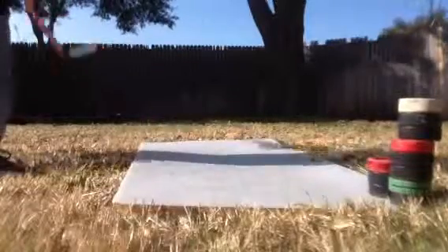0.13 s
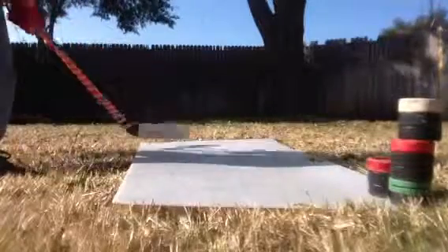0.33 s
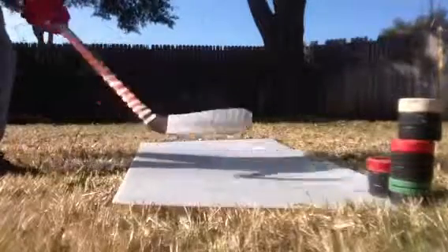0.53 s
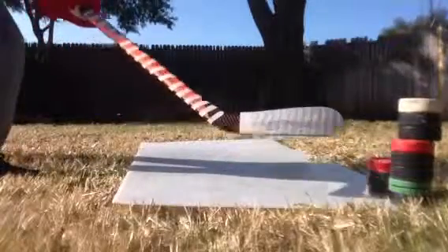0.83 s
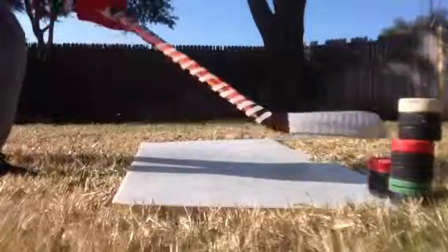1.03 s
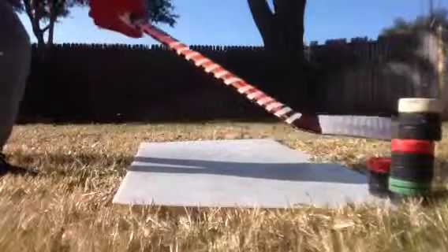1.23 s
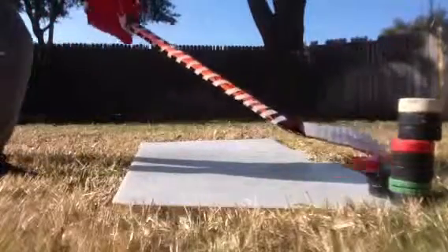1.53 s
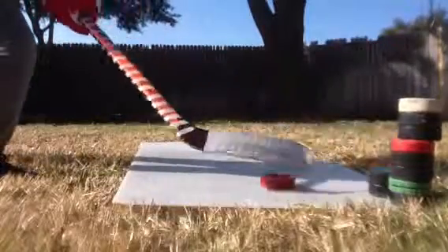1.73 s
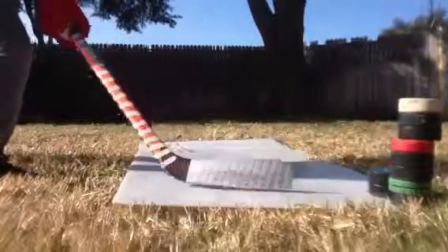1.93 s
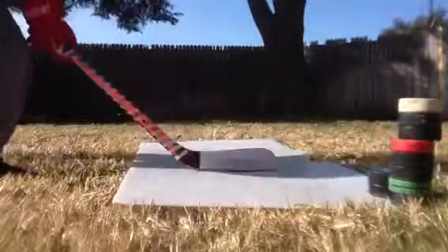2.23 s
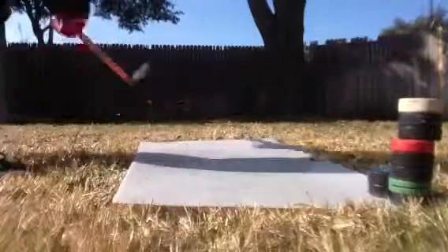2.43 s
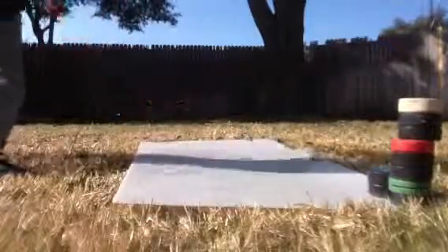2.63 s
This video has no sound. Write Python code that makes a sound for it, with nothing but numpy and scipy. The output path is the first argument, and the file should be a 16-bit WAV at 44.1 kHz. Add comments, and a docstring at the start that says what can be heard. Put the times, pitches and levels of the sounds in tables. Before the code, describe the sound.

A shot hockey puck cracks hard against boards and echoes round a yard; after a quiet gap with faint footfalls, another puck clatters on a plastic pad close to the microphone, is tapped, scraped and flicked.

```python
"""Backyard hockey practice

A shot puck cracks against boards, modelled as ringing modes plus noise bursts, and the yard echoes.
The stick pulls the next puck off a stack: it clatters onto a plastic pad as struck modes, is tapped
by the blade, swept along with a rising friction hiss and flicked off the toe.
Feet thud on the dry lawn as short low swells, over rustles, a low ring and outdoor air of coloured noise."""
import sys
import numpy as np
from scipy import signal
from scipy.fft import rfft, irfft, next_fast_len
from scipy.io import wavfile

SR = 44100
rng = np.random.default_rng(int(sys.argv[2]) if len(sys.argv) > 2 else 0)


def digitize_waveform(pressure):
    """Quantize a signal to 16-bit integers and store it at the path in sys.argv[1].

    Rows of a 2-D input are taken as channels; values are limited to [-1, 1].
    """
    field = np.atleast_2d(pressure).T
    bounded = np.clip(field, -1, 1)
    quanta = np.round(bounded * 32767).astype(np.int16)
    wavfile.write(sys.argv[1], SR, quanta)


N = 123479
TIME = np.arange(N) / SR  # seconds

# The shot landing, then its reflections. Each row: start in seconds, level in dB.
CRACK_ARRIVALS = [(0.2422, -0.94), (.2546, -12), (0.2743, -14), (.2785, -13)]
# Modes of the struck boards. Each row: frequency in Hz, level in dB, t60 in seconds.
BOARD_MODES = [(202, -10.5, 0.084), (273, -8, 0.027), (434, -26, 0.059), (530, -12, 0.077),
               (631, -22, 0.11), (960, -22.5, 0.053), (1614, -34.5, 0.27), (2440, -34, .3),
               (2570, -21, 0.046), (2720, -19, 0.018), (3670, -25, 0.044), (4670, -28.5, 0.09)]
# Colour of the crack's short burst. Each row: frequency in Hz, relative level in dB per Hz.
CRACK_COLOUR = [(100, -28), (400, 6.5), (900, 3.5), (2200, -1.5), (2900, 5.5), (4300, 0), (6000, -8),
                (11500, -11.5), (15500, -21)]
# Colour of the crack's wash round the yard. Each row: frequency in Hz, relative level in dB per Hz.
CRACK_WASH_COLOUR = [(60, -37), (120, -4), (190, 11.5), (400, 5.5), (650, 0.5), (950, -4), (2700, -5),
                     (4800, -8.5), (6100, -13.5), (11000, -18.5), (15500, -42)]
# The puck knocking on the pad; the row at 1.9432 s is the blade striking the puck. Each row: start in seconds,
# knock, edge click and puck ring levels in dB.
PAD_KNOCKS = [(1.6584, -1.5, -23, -28.5), (1.6653, -12, -40, -46), (1.6844, 1, -19.5, -25),
              (1.6894, -21, -25, -36), (1.7282, -14, -32.5, -42), (1.9432, -10.5, -27, -21.5),
              (2.386, -15.5, -37, -44)]
# Modes of the plastic pad. Each row: frequency in Hz, level in dB, t60 in seconds.
PAD_MODES = [(242, -16.5, 0.032), (382, -11, 0.021), (564, -11.5, 0.018), (1360, -16, 0.0087),
             (1570, -26, 0.03), (2310, -34, 0.016)]
# Colour of the puck's edge click. Each row: frequency in Hz, relative level in dB per Hz.
CLICK_COLOUR = [(300, -1), (1500, 4.5), (2400, -1.5), (11000, -7.5), (15500, -13)]
# Modes of the hard puck. Each row: frequency in Hz, level in dB, t60 in seconds.
PUCK_MODES = [(3400, -2, 0.0077), (4350, -7, .008), (6730, -5, 0.013), (10340, -8, .011)]
# The blade touching puck or pad. Each row: start in seconds, level in dB, contact hardness as cut-off in Hz.
BLADE_TAPS = [(2.0605, 0, 1650), (2.205, -15.5, 1700), (2.2244, -16.5, 2220), (2.263, -13.5, 1150),
              (2.3025, -7.5, 623), (2.403, -9, 1610), (2.4097, -10.5, 2000), (2.4196, -13.5, 3500),
              (2.425, -17, 4500), (2.466, 0, 450), (2.5042, -15, 615)]
# Modes of the blade. Each row: frequency in Hz, level in dB, t60 in seconds.
BLADE_MODES = [(311, -20.5, 0.031), (485, -20, 0.028), (638, -20.5, 0.026), (868, -16, 0.012),
               (1334, -12.5, 0.012), (1600, -14, 0.0074), (2160, -20, 0.009), (3200, -27, 0.01),
               (4120, -21.5, 0.013)]
# The sweep along the pad. Each row: time in seconds, level of the sliding hiss in dB.
SWEEP_LEVEL = [(1.69, -90), (1.74, -55), (1.88, -74), (2.06, -63.5), (2.1, -55.5), (2.19, -54), (2.27, -49),
               (2.345, -43.5), (2.386, -38), (2.396, -49.5), (2.43, -53), (2.46, -66.5)]
# Colour of the friction hiss. Each row: frequency in Hz, relative level in dB per Hz.
HISS_COLOUR = [(2000, -12), (4200, -6.5), (5500, -15), (6600, -5), (7400, -11.5), (9500, -9.5),
               (10500, -5.5), (11200, -5.5), (12400, -0.5), (13300, -9), (15500, -24)]
# Spinning puck rubbing on the blade's tape. Each row: centre in seconds, level in dB, half length in seconds.
TAPE_RASPS = [(1.705, -49, 0.0069), (1.957, -46.5, 0.0048), (2.409, -39, 0.0035), (2.423, -33.5, 0.0047)]
# Colour of those rasps. Each row: frequency in Hz, relative level in dB per Hz.
RASP_COLOUR = [(600, -3), (1500, 5.5), (4200, -0.5), (5500, -10), (12000, -15)]
# Shudders of the pad. Each row: centre in seconds, level in dB, half length in seconds.
PAD_WOBBLES = [(1.935, -40, 0.029), (2.512, -36, 0.029)]
# Colour of those shudders. Each row: frequency in Hz, relative level in dB per Hz.
WOBBLE_COLOUR = [(70, -14.5), (170, 1), (330, -0.5), (600, -45.5)]
# Feet and stick on the lawn. Each row: start in seconds, level in dB, frequency in Hz, rise in seconds.
LAWN_THUDS = [(.531, -26, 245, 0.0015), (1.175, -41, 105, 0.0071), (1.234, -26.5, 210, 0.0026),
              (1.495, -36, 150, 0.0048), (1.605, -31.5, 137, 0.0047), (1.630, -25.5, 189, 0.0029),
              (1.881, -32, 184, 0.0037), (1.919, -31, 237, 0.0017), (2.172, -34.5, 195, 0.0021),
              (2.4659, -22, 175, 0.0032), (2.504, -27.5, 158, 0.0035), (2.511, -26.5, 282, 0.004),
              (2.524, -30, 163, 0.0059)]
# Faint cloth and dry grass. Each row: centre in seconds, level in dB, half length in seconds.
FAINT_RUSTLES = [(0.507, -55.5, 0.018), (0.736, -57.5, 0.023), (0.846, -56.5, 0.01), (0.887, -60.5, 0.066)]
# Colour of those rustles. Each row: frequency in Hz, relative level in dB per Hz.
RUSTLE_COLOUR = [(1500, -21), (4500, -1.5), (9000, 4), (12500, 4.5), (15500, 1.5)]
# Colour of the low rustle of movement. Each row: frequency in Hz, relative level in dB per Hz.
SHUFFLE_COLOUR = [(40, -38), (150, 0), (300, -8.5), (600, -16), (1500, -27), (5000, -35.5)]
# The low rustle over time. Each row: time in seconds, level in dB.
SHUFFLE_OVER_TIME = [(0, -47.5), (.55, -53), (.7, -56), (1.08, -55), (1.18, -52), (1.6, -51), (1.85, -48.5),
                     (2.53, -48), (2.66, -51.5), (2.8, -47.5)]
# How long the yard rings. Each row: frequency in Hz, t60 in seconds.
YARD_DECAY = [(150, .75), (500, .58), (2000, .7), (4500, .56), (7000, .41), (13000, .34)]
# Colour of the yard's echo of the stickwork. Each row: frequency in Hz, relative level in dB per Hz.
YARD_COLOUR = [(100, -3), (400, -1), (1200, -4), (14000, -6)]
# Colour of the outdoor air. Each row: frequency in Hz, relative level in dB per Hz.
AIR_COLOUR = [(29, -62), (50, -6), (150, 3), (214, 2), (557, -21.5), (964, -3.5), (1970, -17),
              (8070, -20.5), (15000, -28.5)]

CRACK_DB, CRACK_T60_S, CRACK_PUSH_DB, CRACK_PUSH_HZ = -14, 0.039, 1.5, 4170
SLAP_HZ, SLAP_DB, SLAP_RISE_S = 526, -6.5, 0.0015  # the first push of the boards
THUMP_HZ, THUMP_DB, THUMP_RISE_S = 95, -25.5, 0.0014  # their whole bulk gives way
# The low boom returns in a flutter, each return quieter by the loss.
BOOM_HZ, BOOM_DB, BOOM_EVERY_S, BOOM_LOSS_DB, BOOM_RISE_S = 195, -19, 0.024, 4.5, 0.0095
WASH_DB, WASH_RISE_S = -23.5, 0.0043
CLICK_T60_S, PAD_LOW_HZ = 0.015, 140
GRIT_PER_S, GRIT_DB = 900, -2.5  # crackle, relative to the hiss
# The rumble moves by RUMBLE_FOLLOWS dB for each dB of the sweep.
SLIPS_PER_S, RUMBLE_DB, RUMBLE_FOLLOWS, RASP_PER_S = 300, -3.5, 0.85, 1700
ECHO_S, ECHO_DB = 0.0213, -17.5  # one clear reflection off a wall
YARD_DB, YARD_RISE_S = -16.5, 0.002
RING_HZ, RING_DB, RING_T60_S = 247.6, -39.5, 0.39
AIR_DB = -58.5
MIC_LOW_HZ, MIC_TOP_HZ, CUTOFF_HZ = 69, 13900, 15600


def from_db(db):
    """Turn decibels into gain."""
    return 10 ** (np.asarray(db) / 20)


def at_hz(points, hz):
    """Read a table on a log-frequency axis."""
    table_hz, values = np.transpose(points)
    return np.interp(np.log(hz + 1e-9), np.log(table_hz), values)


def in_time(rows):
    """Join rows of time and value by straight lines."""
    return np.interp(TIME, *np.transpose(rows))


def grains(colour, per_s):
    """Random sharp ticks of a given colour, rms 1."""
    size = next_fast_len(N)
    hz = np.arange(size // 2 + 1) * SR / size
    ticks = (rng.random(size) < per_s / SR) * rng.standard_normal(size)
    spectrum = rfft(ticks) * from_db(at_hz(colour, hz)) * (hz > 20)
    x = irfft(spectrum, size)[:N]
    return x / x.std()


def noise(colour):
    """Smooth noise of a given colour, rms 1: a tick on every sample."""
    return grains(colour, SR)


def dying(t60):
    """Exponential decay, down 60 dB after t60 seconds."""
    return np.exp(-np.log(1000) * TIME / t60)


def swell(centre_s, half_s):
    """A bell-shaped rise and fall."""
    return np.exp(-0.5 * ((TIME - centre_s) / half_s) ** 2)


def placed(x, start_s):
    """Move a sound to its start time."""
    silence = np.zeros(int(max(start_s, 0) * SR))
    return np.concatenate([silence, x])[:N]


def soften(x, hz, order=2):
    """Low-pass: a soft contact or a dull ear for treble."""
    low_pass = signal.butter(order, min(hz, SR / 2 - 1), fs=SR, output="sos")
    return signal.sosfilt(low_pass, x + 1e-18)


def thin(x, hz):
    """High-pass of a body or microphone that passes little bass."""
    high_pass = signal.butter(2, hz, "high", fs=SR, output="sos")
    return signal.sosfilt(high_pass, x + 1e-18)


def struck(modes, spread_db):
    """One blow on a body: every mode rings and decays, its strength varied at random."""
    t = TIME[:SR // 2]
    rings = np.zeros(len(t))
    for k, (hz, db, t60) in enumerate(modes):
        strength = (-1) ** k * from_db(db + spread_db * rng.normal())  # neighbours push opposite ways
        rings += strength * np.sin(2 * np.pi * hz * t) * np.exp(-np.log(1000) * t / t60)
    return np.pad(rings, (0, N - len(t)))


def thud(hz, rise_s):
    """A few low cycles that swell and die."""
    u = TIME / max(rise_s, 1e-4)
    envelope = u * np.exp(1 - np.minimum(u, 100))
    return envelope * np.sin(2 * np.pi * hz * TIME)


def wash(colour, rise_s):
    """Diffuse echo of fence, house and trees; each octave dies at its own rate."""
    rest, out = noise(colour), 0
    for hz in 125 * 2.0 ** np.arange(8):
        top_hz = min(hz * np.sqrt(2), SR / 2 - 1000)
        low_pass = signal.butter(4, top_hz, fs=SR, output="sos")
        band = signal.sosfiltfilt(low_pass, rest)
        rest = rest - band
        out = out + band * dying(at_hz(YARD_DECAY, hz))
    return out * (1 - np.exp(-TIME / rise_s))


def shot():
    """The puck hits the boards: spike, slap, modes and burst, then a thump, a low flutter and the wash."""
    spike = from_db(CRACK_PUSH_DB) * soften(signal.unit_impulse(N), CRACK_PUSH_HZ)
    slap = from_db(SLAP_DB) * thud(SLAP_HZ, SLAP_RISE_S)
    burst = from_db(CRACK_DB) * noise(CRACK_COLOUR) * dying(CRACK_T60_S)
    crack = spike + slap + struck(BOARD_MODES, spread_db=0.5) + burst
    cracks = sum(from_db(db) * placed(crack, s) for s, db in CRACK_ARRIVALS)

    start_s = CRACK_ARRIVALS[0][0]
    thump = placed(from_db(THUMP_DB) * thud(THUMP_HZ, THUMP_RISE_S), start_s)
    flutter = 0
    for k in range(3):
        boom = from_db(BOOM_DB - BOOM_LOSS_DB * k) * thud(BOOM_HZ, BOOM_RISE_S)
        flutter = flutter + placed(boom, start_s + (k + 1) * BOOM_EVERY_S)
    tail = placed(from_db(WASH_DB) * wash(CRACK_WASH_COLOUR, WASH_RISE_S), start_s)
    return cracks + thump + flutter + tail


def puck_on_pad():
    """Hollow knocks of the pad, each with a click of the puck's edge and the puck's own brief ring."""
    knocks = 0
    for start_s, knock_db, click_db, ring_db in PAD_KNOCKS:
        knock = from_db(knock_db) * struck(PAD_MODES, spread_db=2)
        click = from_db(click_db) * noise(CLICK_COLOUR) * dying(CLICK_T60_S)
        ring = from_db(ring_db) * struck(PUCK_MODES, spread_db=0)
        knocks = knocks + placed(knock + click + ring, start_s)
    return thin(knocks, PAD_LOW_HZ)


def blade():
    """Dull taps: the taped blade's modes, low-passed by the contact, harder as the puck rolls off the toe."""
    taps = 0
    for start_s, db, hardness_hz in BLADE_TAPS:
        tap = soften(struck(BLADE_MODES, spread_db=0.5), hardness_hz)
        taps = taps + placed(from_db(db) * tap, start_s)
    return taps


def slide():
    """Friction hisses and crackles, small slips ring the pad, all following the sweep; the tape rasps."""
    level_db = in_time(SWEEP_LEVEL)
    grit = from_db(GRIT_DB) * grains(HISS_COLOUR, GRIT_PER_S)
    hiss = from_db(level_db) * (noise(HISS_COLOUR) + grit)

    slips = (rng.random(N) < SLIPS_PER_S / SR) * rng.standard_normal(N)
    rub = signal.fftconvolve(slips, struck(PAD_MODES, spread_db=2))[:N]
    rub = thin(rub, PAD_LOW_HZ)
    sliding = (TIME > SWEEP_LEVEL[0][0]) * (TIME < SWEEP_LEVEL[-1][0])
    rumble = from_db(RUMBLE_DB + RUMBLE_FOLLOWS * level_db) * rub / rub.std() * sliding

    rasp_level = sum(from_db(db) * swell(s, half_s) for s, db, half_s in TAPE_RASPS)
    return hiss + rumble + rasp_level * grains(RASP_COLOUR, RASP_PER_S)


def pad_wobble():
    """The pad shudders on the grass as the player's weight and blade load it and let it go."""
    level = sum(from_db(db) * swell(s, half_s) for s, db, half_s in PAD_WOBBLES)
    return level * noise(WOBBLE_COLOUR)


def player():
    """Thuds on the lawn as low swells; shuffling and faint rustles as coloured noise."""
    thuds = sum(placed(from_db(db) * thud(hz, rise_s), s) for s, db, hz, rise_s in LAWN_THUDS)
    rustle_level = sum(from_db(db) * swell(s, half_s) for s, db, half_s in FAINT_RUSTLES)
    rustles = rustle_level * noise(RUSTLE_COLOUR)
    shuffle = from_db(in_time(SHUFFLE_OVER_TIME)) * noise(SHUFFLE_COLOUR)
    return thuds + rustles + shuffle


def low_ring():
    """One low sine that dies away from the start."""
    return from_db(RING_DB) * np.sin(2 * np.pi * RING_HZ * TIME) * dying(RING_T60_S)


def outdoor_air():
    """Steady coloured noise of the open air."""
    return from_db(AIR_DB) * noise(AIR_COLOUR)


def in_yard(near):
    """Add one clear wall reflection and the yard's diffuse echo to the near sounds."""
    echo = wash(YARD_COLOUR, YARD_RISE_S)
    reflection = from_db(ECHO_DB) * placed(near, ECHO_S)
    diffuse = from_db(YARD_DB) * signal.fftconvolve(near, echo / np.linalg.norm(echo))[:N]
    return near + reflection + diffuse


def scene():
    """The far crack, the near stickwork with its echo, the player and the open air."""
    stickwork = in_yard(puck_on_pad() + blade() + slide())
    mix = shot() + stickwork + pad_wobble() + player() + low_ring() + outdoor_air()
    return mix[None]  # one channel


def record(dry):
    """The microphone thins the deep bass and softens the top, which is then cut steeply."""
    x = thin(soften(dry, MIC_TOP_HZ, order=4), MIC_LOW_HZ)
    steep_cut = signal.ellip(10, 0.1, 80, CUTOFF_HZ, fs=SR, output="sos")
    return signal.sosfilt(steep_cut, x)


dry = scene()
out = record(dry)
digitize_waveform(out)
```